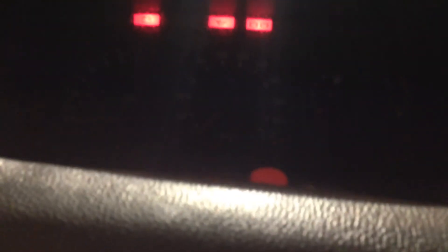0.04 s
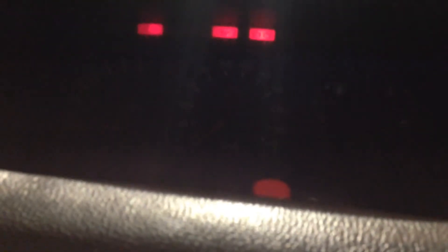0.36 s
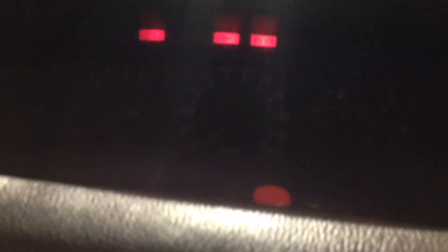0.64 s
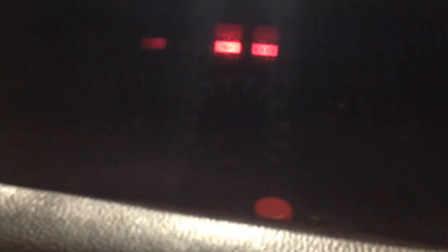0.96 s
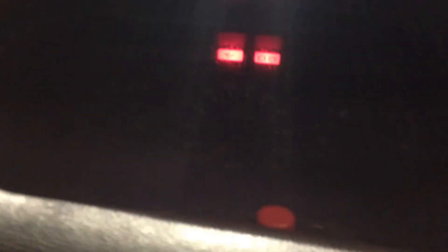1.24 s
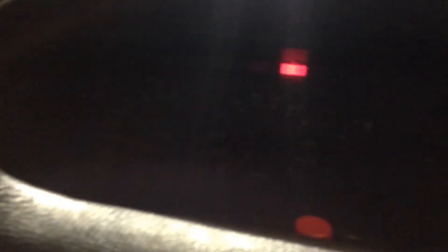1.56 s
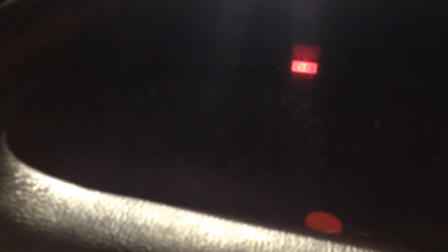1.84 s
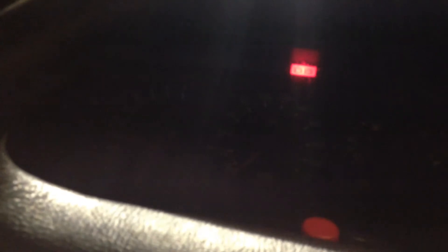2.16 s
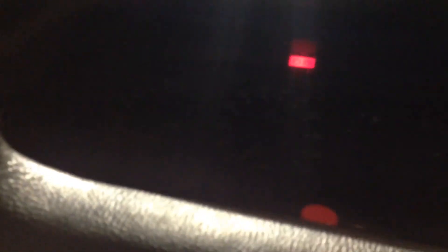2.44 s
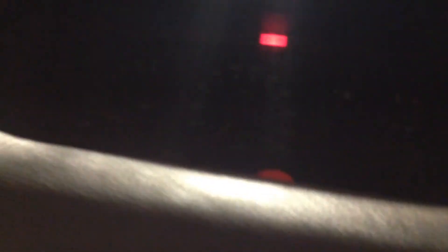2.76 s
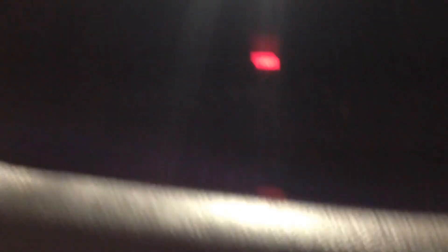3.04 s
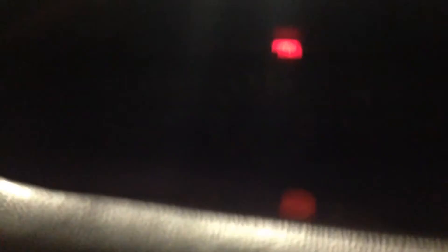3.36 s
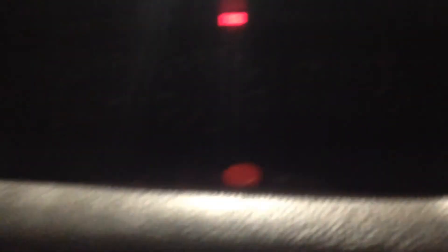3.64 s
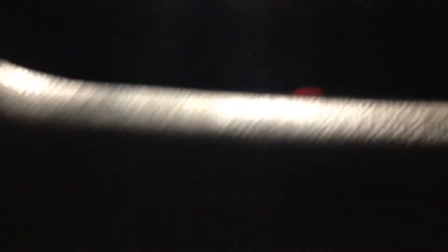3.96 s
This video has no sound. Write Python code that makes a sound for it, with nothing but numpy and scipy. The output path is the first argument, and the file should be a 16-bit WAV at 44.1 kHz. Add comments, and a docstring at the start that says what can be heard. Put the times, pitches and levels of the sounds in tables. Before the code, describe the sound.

A diesel engine cranks briefly, starts and settles to idle, heard inside the car.

```python
"""Cold diesel start

A cold four-cylinder diesel starts, heard from the driver's seat. A relay clicks, the starter motor engages and
whirs, a few heavy firings catch, and the engine revs up briefly and settles to idle. Each firing knocks through
the wall behind the engine, and its low tones boom in the cabin. Relays click in the dashboard, small ticks
sound in the cabin, and loose trim buzzes as the car shakes."""
import sys
import numpy as np
from scipy import signal
from scipy.fft import rfft, irfft
from scipy.io import wavfile

SR = 44100
rng = np.random.default_rng(int(sys.argv[2]) if len(sys.argv) > 2 else 0)


def master_out(mix):
    """Clip the mix to full scale and print it as 16-bit PCM to the path in sys.argv[1]."""
    frames = np.transpose(np.atleast_2d(mix))
    ceiling = np.clip(frames, -1, 1)
    pcm = np.round(ceiling * 32767).astype(np.int16)
    wavfile.write(sys.argv[1], SR, pcm)


N = 176400
T = np.arange(N) / SR

# Levels in the tables are relative. A ring time (t60) is how long a sound takes to fall by 60 dB.
# tone of the still cabin air (frequency [Hz], level [dB])
AIR_TONE = [(15, -35.5), (25, -6.5), (142, -5), (769, -16.5), (903, -21), (1390, -2.5), (1910, -22),
            (3440, -18), (4750, -19.5), (15000, -28.5)]
# faint electric whir (frequency [Hz], width [Hz], level [dB])
WHIR_BANDS = [(1434, 74, -86.5), (1670, 140, -79), (3560, 400, -77.5)]
# small ticks in the cabin (time [s], level [dB])
CABIN_TICKS = [(0.806, -57.5), (.885, -54), (0.932, -51), (1.176, -59.5), (1.711, -63), (1.974, -52),
               (1.997, -52), (2.034, -55), (3.449, -53), (3.61, -62)]
# tone of a tick (frequency [Hz], level [dB])
TICK_TONE = [(500, -35), (2500, -1.5), (5000, 2.5), (8000, -2.5), (15000, -18.5)]
# buzzes of loose trim (middle time [s], length [s], frequency [Hz], level [dB])
TRIM_BUZZES = [(2.14, .05, 3400, -69), (2.235, 0.078, 2880, -65), (2.39, 0.044, 3420, -66.5),
               (3.7, 0.56, 2680, -67.5), (3.96, 0.092, 3330, -64)]
# relay clicks (time [s], level [dB], low ring [dB], treble lift [dB], ring time [s])
RELAY_CLICKS = [(0.232, -28.5, -36, 8.5, 0.056), (.968, -26, -10, 6.5, 0.048),
                (3.895, -35.5, -4.5, -2.5, 0.056)]
# tone of a relay's snap (frequency [Hz], level [dB])
SNAP_TONE = [(120, -24), (250, -31), (500, 9), (800, -6.5), (1300, 0.5), (2850, -3.5), (4720, -7),
             (6500, -7.5), (8800, -6.5), (11200, -14), (15000, -17)]
# high ringing notes of a relay (frequency [Hz], level [dB], ring time [s])
RELAY_NOTES = [(4795, -4, 0.029), (5030, -11, 0.018), (7860, -19, 0.039), (10330, -7, 0.049),
               (11150, -1.5, 0.017), (10900, -10, .045), (12950, -3, 0.037)]
# starter loudness (time [s], growl [dB], whine [dB])
STARTER_LEVELS = [(.3, -65, -84), (.32, -36.5, -64), (.4, -40.5, -75.5), (.46, -38, -71), (.52, -35.5, -77),
                  (.56, -39, -68.5), (.7, -33, -67), (.8, -36, -75), (.92, -31.5, -75), (1.02, -37, -76),
                  (1.1, -81, -100)]
# tone of the starter's growl (frequency [Hz], level [dB])
GROWL_TONE = [(20, -21), (35, 1.5), (90, 2.5), (210, 0), (290, -10), (480, -16), (720, -16), (1000, -27),
              (2200, -34.5), (3100, -47.5), (5200, -44.5), (15000, -69)]
# how fast the starter turns (time [s], speed [ratio])
CRANK_SPEED = [(.31, .8), (.4, .94), (.43, 1.02), (.455, 1.04), (.48, 1.01), (.5, .95), (.56, .96),
               (.62, 1), (.68, .95), (.73, .96), (.77, 1.01), (.85, .96)]
# starter gear tones (frequency at speed 1 [Hz], level [dB])
GEAR_TONES = [(2000, 5), (2520, 2)]
# high ringing of the starter (frequency [Hz], width [Hz], level [dB])
STARTER_BANDS = [(7150, 160, -9)]
# jolts of the starter engaging and the first firings (time [s], thump [dB], knock [dB], clatter [dB])
JOLTS = [(.305, -37, -37, -56), (.537, -37, -56, -74), (.612, -27.5, -39.5, -60.5),
         (0.747, -31, -35.5, -57), (0.781, -26.5, -75, -69), (0.823, -25, -36, -53),
         (0.869, -35, -33, -49.5), (.916, -25, -32, -57.5), (0.957, -33, -39, -58.5),
         (.995, -29.5, -66, -72)]
# low notes of the engine rocking on its mounts (frequency [Hz], level [dB], ring time [s])
THUMP_NOTES = [(58, 8, 0.42), (80.4, 6.5, 0.083), (133.3, -2.5, 0.54), (180, -9, .12)]
# tone of a jolt's knock (frequency [Hz], level [dB])
JOLT_TONE = [(60, -20), (200, 5.5), (400, 5), (750, -3), (1200, -3.5), (1800, -5), (2500, -15.5),
             (4000, -40), (9000, -43)]
# engine speed (time [s], firing rate [Hz])
FIRING_RATE = [(.9, 28), (1.05, 37.5), (1.14, 40.6), (1.35, 41.2), (1.51, 43.9), (1.71, 44.7), (1.78, 42),
               (1.9, 33.8), (2.0, 31.4), (2.1, 32.3), (2.21, 29.6), (2.35, 34), (2.47, 31.4), (2.6, 32.3),
               (2.81, 32), (3.4, 32.2), (4, 32.2)]
# strength of the four cylinders in firing order (level [dB])
CYLINDER_LEVELS = [0.066, -2.6, 1, -2.1]
# cabin boom at multiples of the firing rate (time [s], 1x [dB], 2x [dB], 3x [dB], 4x [dB])
BOOM_LEVELS = [(0.95, -36, -35, -55, -37), (1.06, -27, -29, -32, -59), (1.15, -55, -31.5, -29, -39),
               (1.28, -38, -25.5, -32.5, -40), (1.45, -33.5, -29.5, -33, -38.5),
               (1.6, -22.5, -35, -37, -45), (1.7, -27.5, -36, -32, -63), (1.78, -34, -32, -60, -39),
               (1.85, -44, -26, -27.5, -45), (1.94, -29.5, -36.5, -53, -37), (2.02, -66, -19.5, -30, -38),
               (2.11, -29, -35.5, -55, -51), (2.26, -46, -23, -49, -30.5), (2.35, -33, -34, -47, -43.5),
               (2.46, -40.5, -26, -60, -37.5), (3.0, -34, -27, -50, -37.5),
               (3.3, -39.5, -26.5, -45.5, -38.5), (3.8, -34.5, -26, -56, -39.5), (4.0, -33, -29, -65, -56)]
# weaker engine tones (multiple of the firing rate [ratio], level [dB])
WEAK_TONES = [(1.5, -66.5), (2.5, -52.5), (5, -58.5), (6, -61.5)]
# belt and gear whine (multiple of the firing rate [ratio], level [dB])
BELT_TONES = [(4.1, -47), (6, -48), (8.2, -49), (9, -50), (12.1, -49)]
# loudness of the running engine (time [s], rumble [dB], knock [dB], clatter [dB])
ENGINE_LEVELS = [(.94, -37.5, -45.5, -62), (1.06, -36.5, -49, -69.5), (1.25, -41.5, -45, -68.5),
                 (1.45, -42.5, -46.5, -68.5), (1.65, -41, -47.5, -68), (1.82, -47.5, -51.5, -71.5),
                 (1.93, -42.5, -45.5, -67), (2.0, -34, -40, -64), (2.09, -43.5, -50, -70),
                 (2.24, -37.5, -44.5, -65), (2.33, -42.5, -48.5, -70), (2.42, -39, -46, -64.5),
                 (2.6, -43, -47, -66.5), (3.3, -43, -47, -67), (3.6, -41, -49, -67), (3.96, -41, -48, -62)]
# tone of the car body's rumble (frequency [Hz], level [dB])
RUMBLE_TONE = [(20, -6), (45, -0.5), (80, 3.5), (130, 1.5), (180, -3), (250, -11), (350, -12.5), (500, -20),
               (900, -42), (3000, -70)]
# tone of the engine's knock (frequency [Hz], level [dB])
KNOCK_TONE = [(150, -41), (300, -17), (450, 2), (570, 1), (690, 3), (850, -0.5), (1040, 2), (1250, -7),
              (1480, -2), (1800, -6.5), (2200, -14), (3000, -25.5), (6000, -41)]
# tone of the engine's high clatter (frequency [Hz], level [dB])
CLATTER_TONE = [(1200, -39), (2500, 2.5), (3300, 3.5), (4700, -1.5), (5800, -5), (6700, -6), (8000, -9.5),
                (10500, -16), (12500, -32), (15500, -36.5)]
# ringing notes of the engine block (frequency [Hz], level [dB], ring time [s])
BLOCK_NOTES = [(382, -4, 0.021), (515, -6.5, .05), (704.6, 1, 0.025), (804, -18, 0.03),
               (1019, -12.5, 0.042), (1230, -24, 0.034), (1444, -0.5, 0.019), (1637, -7, .045),
               (1812, -9.5, 0.018)]


def amp(db):
    """Turns decibels into a gain."""
    return 10 ** (np.asarray(db) / 20)


def unit(x):
    """Scales a signal to an average power of 1."""
    return x / np.sqrt(np.mean(x ** 2) + 1e-20)


def curve(table, column=1):
    """One column of a table, joined by straight lines in time."""
    rows = np.array(table)
    return np.interp(T, rows[:, 0], rows[:, column])


def colour(x, tone, size=8192):
    """Filters a sound to the given tone; white noise keeps its power."""
    hz, db = np.transpose(tone)
    bins_hz = abs(np.fft.fftfreq(size, 1 / SR))
    log_gain = np.log(amp(np.interp(np.log(bins_hz + 1), np.log(hz), db)))
    response = np.exp(np.conj(signal.hilbert(log_gain)))  # rings after a hit, never before it
    taps = np.fft.ifft(response).real[:size // 2]
    return signal.fftconvolve(x, taps / np.linalg.norm(taps))[:N]


def noise():
    """White noise: an even hiss."""
    return rng.standard_normal(N)


def band(hz, width_hz):
    """Noise around one pitch; at 0 Hz, a random waver."""
    distance = 2 * (np.fft.rfftfreq(N, 1 / SR) - hz) / width_hz
    return unit(irfft(rfft(noise()) / (1 + distance ** 4), N))


def rise_and_fall(age, rise_s, t60):
    """Loudness of a hit as it ages: a quick rise, then a steady dying away."""
    return np.minimum(age / rise_s, 1) * amp(-60 * np.maximum(age - rise_s, 0) / t60)


def burst(start, rise_s, t60):
    """Loudness over time of one hit at the given moment."""
    out = np.zeros(N)
    live = (T > start) & (T < start + rise_s + 2 * t60)
    out[live] = rise_and_fall(T[live] - start, rise_s, t60)
    return out


def ring(start, notes, rise_s):
    """The fading notes of something struck once."""
    return sum(amp(db) * burst(start, rise_s, t60) * np.sin(2 * np.pi * hz * (T - start))
               for hz, db, t60 in notes)


def firing_count(zero_at_s=1.987):
    """A smooth count that passes a whole number at every firing."""
    count = np.cumsum(curve(FIRING_RATE)) / SR
    return count - np.interp(zero_at_s, T, count)


def fade_in(start_s=0.84, rise_s=0.11):
    """Rises from 0 to 1, by default as the engine catches."""
    return np.clip((T - start_s) / rise_s, 0, 1)


def swell(middle_s, half_width_s):
    """A smooth bump in time with a peak of 1."""
    return np.exp(-((T - middle_s) / half_width_s) ** 2)


def firing_pulses(rise_s, decay_s, scatter_db, injector=0.5, injector_phase=0.64):
    """Loudness of the uneven firings, each led in by a weaker blow from the fuel injector."""
    count, rate = firing_count(), curve(FIRING_RATE)
    index = np.floor(count - np.floor(count[0])).astype(int)
    cylinder_db = np.array(CYLINDER_LEVELS)[index % len(CYLINDER_LEVELS)]
    strength = amp(cylinder_db + scatter_db * rng.standard_normal(index.max() + 1)[index])
    blow = lambda age: (1 - np.exp(-age / rise_s)) * np.exp(-age / decay_s)
    return unit(strength * blow(count % 1 / rate) + injector * blow((count - injector_phase) % 1 / rate))


def cabin_air(air_db=-72, whir_end_s=0.24, fade_s=0.039):
    """Still air, and a faint electric whir that stops before the starter engages."""
    whir = sum(amp(db) * band(hz, width) for hz, width, db in WHIR_BANDS)
    return amp(air_db) * colour(noise(), AIR_TONE) + whir * np.clip((whir_end_s - T) / fade_s, 0, 1)


def idle_hum(hz=356, db=-54):
    """An engine accessory hums as the speed settles."""
    return fade_in(start_s=1.87, rise_s=0.23) * amp(db) * band(hz, width_hz=9.2)


def cabin_ticks():
    """Small ticks sound in the cabin."""
    ticks = sum(amp(db) * burst(start, rise_s=0.001, t60=0.05) for start, db in CABIN_TICKS)
    return colour(noise() * ticks, TICK_TONE)


def trim_buzz():
    """Loose trim buzzes for a moment when the firings shake it."""
    shake = firing_pulses(rise_s=0.0058, decay_s=0.0078, scatter_db=-1.5, injector=0)
    return shake * sum(amp(db) * swell(middle, length / 2) * band(hz, width_hz=300)
                       for middle, length, hz, db in TRIM_BUZZES)


def relays(notes_db=-5.5, treble_hz=6000, low_ring_hz=1920):
    """Relays (electric switches) snap in the dashboard and ring in their housings."""
    out = np.zeros(N)
    for start, db, low_db, treble_db, t60 in RELAY_CLICKS:
        tone = [(hz, level + treble_db * min(hz / treble_hz, 1)) for hz, level in SNAP_TONE]
        hiss = colour(noise(), tone) + amp(low_db) * band(low_ring_hz, width_hz=310)
        snap = burst(start, rise_s=0.00027, t60=t60) * hiss
        ping = amp(notes_db + treble_db) * ring(start, RELAY_NOTES, rise_s=0.00017)
        out += amp(db) * (snap + ping)
    return out


def starter(whine_hz=5240, whine_db=-4.5, flutter_db=2):
    """The starter motor growls; its whine and rough gear tones sag as each cylinder squeezes its air."""
    def rough_tone(hz, jitter):
        cycles = np.cumsum(hz * curve(CRANK_SPEED) * (1 + jitter * band(0, 900))) / SR
        return unit(amp(flutter_db * band(0, 80)) * np.sin(2 * np.pi * cycles))
    whine = amp(whine_db) * rough_tone(whine_hz, jitter=0.02)
    gears = sum(amp(db) * rough_tone(hz, jitter=0.062) for hz, db in GEAR_TONES)
    ringing = sum(amp(db) * band(hz, width) for hz, width, db in STARTER_BANDS)
    growl = amp(curve(STARTER_LEVELS)) * colour(noise(), GROWL_TONE)
    return growl + amp(curve(STARTER_LEVELS, column=2)) * (whine + gears + ringing)


def starting_jolts():
    """The starter's gear and the first firings rock the engine on its mounts."""
    thump = sum(amp(db) * ring(start, THUMP_NOTES, rise_s=0.017) for start, db, _, _ in JOLTS)
    knock = sum(amp(db) * burst(start, rise_s=0.017, t60=0.21) for start, _, db, _ in JOLTS)
    clatter = sum(amp(db) * burst(start, rise_s=0.0099, t60=0.26) for start, _, _, db in JOLTS)
    return thump + colour(knock * noise(), JOLT_TONE) + colour(clatter * noise(), CLATTER_TONE)


def block_ring(rise_s=0.0058, scatter_db=0.5, detune=0.0077, ring_db=-3, dip_db=-2):
    """Each firing rings the metal engine block, a little more softly around the rev-up."""
    out = np.zeros(N + SR)
    age = np.arange(SR // 16) / SR
    level_db = curve(ENGINE_LEVELS, column=2) + ring_db + dip_db * swell(1.7, 0.62)
    hz, db, t60 = np.array(BLOCK_NOTES).T[:, :, None]
    fade = amp(db) * rise_and_fall(age, rise_s, t60)
    firing_samples = np.flatnonzero(np.diff(np.floor(firing_count())))
    for n, at in enumerate(firing_samples):
        size, tune, phase = rng.standard_normal((3, len(hz), 1))
        waves = np.sin(2 * np.pi * (hz * (1 + detune * tune) * age + phase))
        notes = fade * amp(scatter_db * size) * waves
        strength = 2 * amp(level_db[at] + CYLINDER_LEVELS[n % len(CYLINDER_LEVELS)])
        out[at:at + len(age)] += strength * notes.sum(0)
    return fade_in() * out[:N]


def knock_noise(rise_s, decay_s, wash, scatter_db, alike=0.6):
    """Bursts of noise, partly alike at every firing, over a steady wash of machine noise."""
    samples_since_firing = (firing_count() % 1 / curve(FIRING_RATE) * SR).astype(int)
    texture = alike * noise()[samples_since_firing] + np.sqrt(1 - alike ** 2) * noise()
    return unit(texture * firing_pulses(rise_s, decay_s, scatter_db) + wash * noise())


def engine_knock(rumble_db=6.5, knock_db=-1.5):
    """Burning fuel knocks at each firing: a low body rumble, a middle knock and a high clatter."""
    low = knock_noise(rise_s=0.004, decay_s=0.008, wash=0.53, scatter_db=-1.7)
    middle = knock_noise(rise_s=0.0059, decay_s=0.0081, wash=0.85, scatter_db=0.2)
    high = knock_noise(rise_s=0.0028, decay_s=0.018, wash=0.74, scatter_db=2.9)
    rumble = colour(low * amp(curve(ENGINE_LEVELS, column=1) + rumble_db), RUMBLE_TONE)
    knock = colour(middle * amp(curve(ENGINE_LEVELS, column=2) + knock_db), KNOCK_TONE)
    clatter = colour(high * amp(curve(ENGINE_LEVELS, column=3)), CLATTER_TONE)
    return fade_in() * (rumble + knock + clatter)


def engine_boom(shift_firings=0.1375, boom_waver_db=0.5, weak_waver_db=4, whine_waver_db=2):
    """Tones at multiples of the firing rate boom in the cabin; belt and gears whine in the rev-up."""
    cycles = firing_count() + shift_firings
    tone = lambda multiple: np.sqrt(2) * np.cos(2 * np.pi * multiple * cycles)
    boom = sum(amp(curve(BOOM_LEVELS, column=k) + boom_waver_db * band(0, 5.3)) * tone(k)
               for k in (1, 2, 3, 4))
    weak = sum(amp(db + weak_waver_db * band(0, 15)) * tone(k) for k, db in WEAK_TONES)
    whine = sum(amp(db + whine_waver_db * band(0, 6.4)) * tone(k) for k, db in BELT_TONES)
    return fade_in() * (boom + weak + whine * swell(1.37, 0.17))


def scene():
    """Everything heard at the driver's seat, in one channel."""
    running = engine_boom() + engine_knock() + block_ring() + idle_hum() + trim_buzz()
    starting = starting_jolts() + starter()
    interior = relays() + cabin_ticks() + cabin_air()
    return (running + starting + interior)[None]


def record(dry, cutoff_hz=15400):
    """Removes the very highest treble."""
    low_pass = signal.firwin(511, cutoff_hz, window=("kaiser", 9), fs=SR)
    return signal.oaconvolve(dry, low_pass[None], "same")


dry = scene()
out = record(dry)
master_out(out)
```